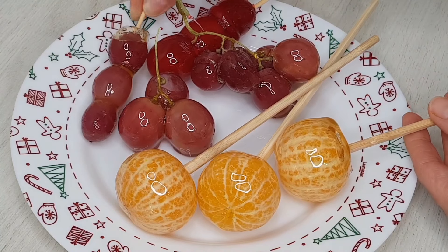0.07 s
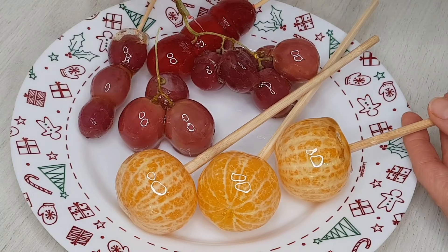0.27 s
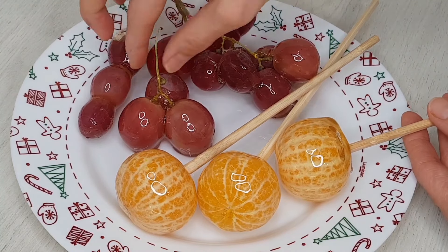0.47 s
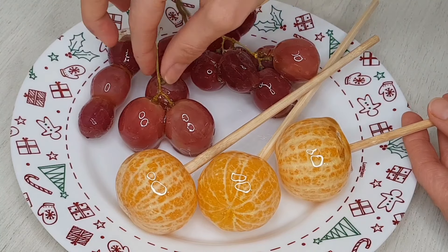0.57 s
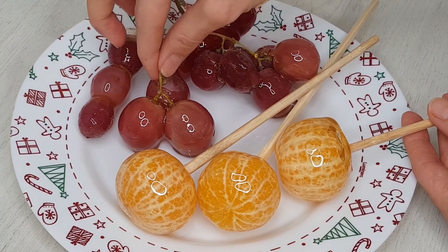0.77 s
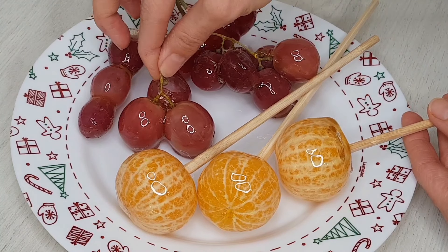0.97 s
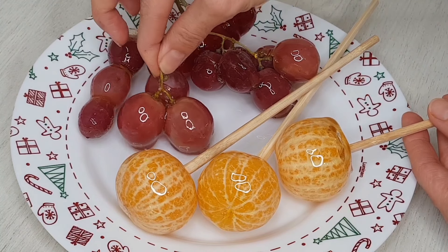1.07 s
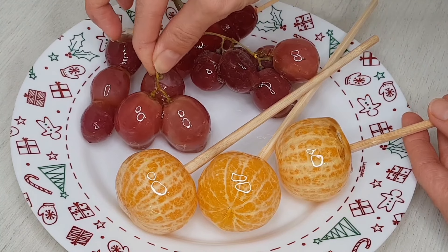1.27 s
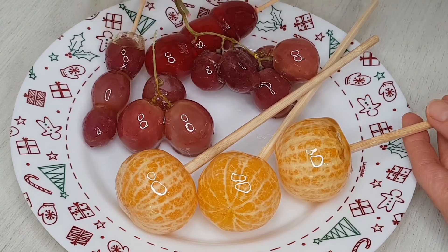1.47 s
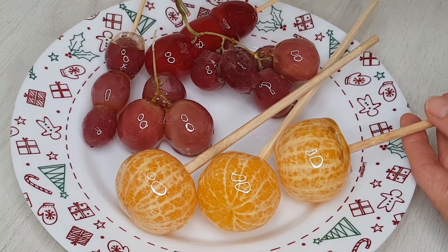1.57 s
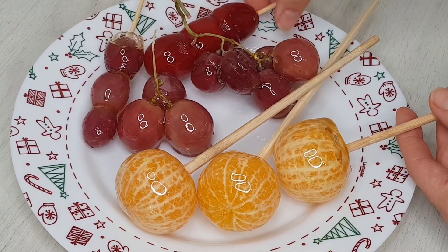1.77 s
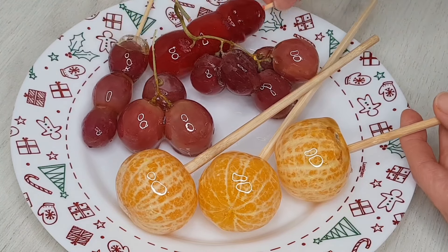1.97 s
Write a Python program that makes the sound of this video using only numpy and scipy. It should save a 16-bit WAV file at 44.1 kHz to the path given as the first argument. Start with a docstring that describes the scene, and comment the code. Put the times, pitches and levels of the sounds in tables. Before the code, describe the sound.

Sugar-coated fruit clinks on a ceramic plate close by, mostly on the right: a soft knock and scrape, sharper knocks, a few faint ticks, then a quick cluster of clacks with light table thumps in a small kitchen.

```python
"""A soft knock and scrape, then sharper knocks: candied grapes on skewers are set down and shifted
on a ceramic plate, close to the microphone and mostly to its right. The hard sugar rings the plate,
glazed fruits clack together, the sugar gives thin, high ticks, and the table thumps underneath.
Farther off, a small kitchen answers over a low rumble and a faint hiss."""
import sys
import numpy as np
from scipy import signal
from scipy.fft import rfft, irfft
from scipy.io import wavfile
from scipy.ndimage import uniform_filter1d

SR = 44100
rng = np.random.default_rng(int(sys.argv[2]) if len(sys.argv) > 2 else 0)


def int16_out(signal):
    """Quantize to a 16-bit WAV file."""
    q = np.round(np.clip(np.atleast_2d(signal).T, -1, 1) * 32767)
    wavfile.write(sys.argv[1], SR, q.astype(np.int16))


N = 88200
BINS = np.fft.rfftfreq(4096, 1 / SR)  # the frequencies [Hz] on which colours are drawn


def knock(level_db, bass_db, treble_db, chatter_s, shell_hz, left_db):
    """A brittle sugar shell lands on the plate and pings briefly at its own pitch."""
    # sugar striking ceramic, heard close: (frequency [Hz], level [dB])
    spectrum = [(40, -21), (100, -9.5), (170, -6.5), (330, -13.5), (520, -5), (800, -6.5), (1250, -1.5),
                (2050, 1.5), (2500, -8.5), (3300, -2.5), (4500, -5.5), (6100, -11), (7000, -15),
                (10500, -19), (13400, -14), (14600, -30)]
    shape = curve(spectrum, BINS) + treble(treble_db) + peak(bass_db, hz=0, width_hz=350.6)
    shell = peak(db=9, hz=shell_hz, width_hz=110)
    hit = contact(strike_s=0.0024, strike_db=-5, chatter_s=chatter_s, chatter_db=-1.91)
    return pan(colour(hit, level_db + shape + shell), left_db)


def clack(level_db, hz, treble_db, hollow_db, left_db):
    """Two glazed fruits meet: a broad resonance and a hollow lower one, damped at once by the flesh."""
    # fruit striking fruit, at a nominal pitch of 2055 Hz: (frequency [Hz], level [dB])
    spectrum = [(60, -24), (180, -15.5), (700, -25.5), (1300, -10.5), (1600, -5), (2000, 8), (2350, -2),
                (3200, -10.5), (4600, -22), (5900, -15.5), (6800, -37.5), (10700, -24.5), (12500, -27),
                (15000, -41)]
    shape = curve(spectrum, BINS * 2055 / hz) + treble(treble_db)
    hollow = peak(hollow_db, hz=1190, width_hz=110)
    hit = contact(strike_s=0.00035, strike_db=-2.1, chatter_s=0.0036, chatter_db=-5.5)
    return pan(colour(hit, level_db + shape + hollow), left_db)


def plate(drive):
    """The ceramic rings; each mode reaches the left of the microphone at its own phase."""
    # modes of the plate: (frequency [Hz], level [dB], t60 [s])
    modes = [(543.4, -9, 0.29), (739, -5.5, 0.23), (1054.3, -11.5, 0.15), (1260, -14.5, 0.17),
             (1490, -18, 0.14), (1694, -20, 0.13), (1924, -12.5, 0.24), (2040, -9.5, .3),
             (2085, -18.5, 0.3), (2645, -16, 0.36), (3202, -9.5, 0.1), (3900, -12.5, 0.15),
             (4450, -10, 0.13), (4890, -14.5, 0.25), (5110, -11, .26), (6172, -3, 0.062),
             (7470, -8.5, 0.069), (8800, -7, 0.12), (10440, -10.5, .09), (12750, -10.5, .1),
             (13400, -10.5, 0.089)]
    t = np.arange(SR // 2) / SR
    ring = np.zeros((2, len(t)))
    for hz, db, t60 in modes:
        phase = [[rng.uniform(-2, 2)], [0]]
        mode = amp(-60 * t / t60) * np.cos(2 * np.pi * hz * t + phase)
        ring += amp(db - 6.5) * mode / np.linalg.norm(mode[0])
    return signal.fftconvolve(drive, ring, axes=1)[:, :N]


def scrape(length_s, level_db, treble_db, left_db, slips_per_s=2800, spread_db=4, size=8192):
    """Sugar drags over the glaze in a run of tiny slips that swells and fades."""
    # sugar sliding on ceramic: (frequency [Hz], level [dB])
    spectrum = [(60, -9), (170, -5.5), (330, -5.5), (500, -5), (750, -6.5), (1400, 1), (2000, -5.5),
                (2600, -3), (4500, -9.5), (7000, -16.5), (10500, -12.5), (15500, -25.5)]
    t = np.arange(size) / SR
    slips = (rng.random(size) < slips_per_s / SR) * amp(spread_db * rng.standard_normal(size))
    slips = slips * pair(rng.choice([-1., 1.], (2, size)), likeness=0.46)
    slips *= np.sin(np.pi * np.minimum(t / length_s, 1))
    slips *= np.sqrt(length_s * SR) / (np.linalg.norm(slips[1]) + 1e-9)
    return pan(colour(slips, level_db + curve(spectrum, BINS) + treble(treble_db)), left_db)


def tick(level_db, crackle_s, crackle_db, left_db):
    """A thin, high tick with a short crackle: a small snap of sugar, or the glassy edge of a hit."""
    # colour of a tick: (frequency [Hz], level [dB])
    spectrum = [(1000, -25.5), (6000, -18.5), (9000, -14.5), (10800, 4.5), (12500, -4), (15500, -9.5)]
    snap = contact(strike_s=0.00025, strike_db=0, chatter_s=crackle_s, chatter_db=crackle_db)
    return pan(colour(snap, level_db + curve(spectrum, BINS)), left_db)


def thump(level_db, hz, rise_s, t60):
    """Weight lands and sets plate and table into a low, dying swing."""
    t = np.arange(SR // 2) / SR
    envelope = amp(level_db - 60 * t / t60) * (1 - np.exp(-t / rise_s))
    return envelope * np.sin(2 * np.pi * hz * t)


def kitchen(sound, walls_s=0.024, early_db=-3):
    """The small room: a dense tail swells when the walls answer; each band dies at its own speed."""
    # decay of the room: (frequency [Hz], t60 [s])
    decay = [(60, 0.46), (130, 0.66), (200, 0.46), (550, 0.35), (1200, 0.39), (2000, 0.41), (4500, 0.48),
             (7000, 0.29), (14000, 0.41)]
    # colour of the room: (frequency [Hz], gain [dB])
    tone = [(60, -1.5), (500, 5), (1900, -2.5), (3000, -7), (4800, -4), (7000, -1), (14000, -4)]
    echoes = burst(fade_s=0.06, likeness=0.71, size=SR)
    echoes /= np.sqrt(abs(uniform_filter1d(echoes ** 2, size=800)) + 1e-18)  # steady level
    hz, frame_s, bands = signal.stft(echoes, SR, nperseg=256)
    bands *= amp(-60 * frame_s / curve(decay, hz)[:, None])
    tail = signal.istft(bands, SR, nperseg=256)[1]
    t = np.arange(tail.shape[1]) / SR
    tail *= amp(early_db * np.exp(-(t / walls_s) ** 4))
    tail = colour(tail / np.linalg.norm(tail[1]), curve(tone, BINS))
    return pan(signal.fftconvolve(sound, tail, axes=1)[:, :N], left_db=1.5)


def hiss(level_db=-65):
    """Room tone: a low rumble, much alike on both sides, and a faint, wide hiss."""
    # steady background: (frequency [Hz], relative density [dB])
    spectrum = [(15, -30), (25, -6.5), (55, 7), (101, -14.5), (119, -5.5), (183, -7), (227, -13.5),
                (631, -18), (945, -22.5), (1140, -19), (1800, -22), (2630, -23), (4500, -25), (4870, -22),
                (7910, -33.5), (11800, -14.5), (15500, -15.5)]
    # its stereo image: (frequency [Hz], left-right likeness [0..1])
    likeness = [(40, 0.94), (200, 0.72), (1000, 0), (12000, 0)]
    hz = np.fft.rfftfreq(N, 1 / SR)
    white = pair(rfft(rng.standard_normal((2, N))), curve(likeness, hz))
    noise = irfft(white * amp(curve(spectrum, hz)), N)
    return pan(amp(level_db) * noise / noise.std(), left_db=-0.5)


def contact(strike_s, strike_db, chatter_s, chatter_db):
    """One sharp strike together with its dying chatter."""
    strike = amp(strike_db) * burst(strike_s, likeness=0.49)
    chatter = amp(chatter_db) * burst(chatter_s, likeness=0.46)
    return strike + chatter


def burst(fade_s, likeness, size=4096):
    """Dying noise with an even spectrum and energy 1 on each side."""
    t = np.arange(size) / SR
    spectrum = rfft(pair(rng.standard_normal((2, size)), likeness) * np.exp(-t / fade_s))
    even = irfft(spectrum / (abs(spectrum) + 1e-12))
    even *= np.exp(-t / fade_s / 10)
    return even / np.linalg.norm(even, axis=1, keepdims=True)


def colour(x, db):
    """Minimum-phase filter with the given gain at each of the BINS."""
    log_gain = np.log(amp(np.concatenate([db, db[-2:0:-1]])))
    taps = np.fft.ifft(np.exp(np.conj(signal.hilbert(log_gain)))).real
    return signal.fftconvolve(x, taps[None, :len(db)], axes=1)


def peak(db, hz, width_hz):
    """A short resonance as a bump in the colour."""
    return db / (1 + ((BINS - hz) / width_hz) ** 2)


def treble(db, corner_hz=3000):
    """A soft treble shelf."""
    return db * BINS ** 2 / (BINS ** 2 + corner_hz ** 2)


def curve(points, hz):
    """A table interpolated on a log-frequency axis."""
    point_hz, value = np.transpose(points)
    return np.interp(np.log(hz + 1), np.log(point_hz + 1), value)


def pair(sides, likeness):
    """Makes two unrelated channels partly alike."""
    left, right = sides
    return np.array([likeness * right + np.sqrt(1 - likeness ** 2) * left, right])


def pan(x, left_db):
    """Raises or lowers the left channel."""
    return x * amp([[left_db], [0]])


def amp(db):
    """Decibels to gain."""
    return 10 ** (np.asarray(db) / 20)


def add(mix, start_s, sound):
    """Adds a sound to a stereo mix."""
    part = mix[:, round(start_s * SR):][:, :sound.shape[-1]]
    part += sound[..., :part.shape[1]]


def scene():
    """The plate close by and to the right of the microphone, the table below, the kitchen around."""
    # sugar hitting the plate: (time [s], level [dB], bass [dB], treble [dB], chatter [s],
    # shell pitch [Hz], left [dB], pitch the struck spot favours [Hz], to plate [dB], to room [dB])
    knocks = [(0.127, -11, 14, -8, 0.0051, 3170, 0.5, 1489, -5, 1.5),
              (0.217, 2.5, 0, 5.5, 0.006, 5260, -0.5, 2095, -4.5, -2),
              (.3703, 11.5, -2.5, 4, 0.0097, 1462, -2.5, 2140, -2.5, -3.5),
              (0.3824, 12, 1, -1.5, 0.0055, 3140, -5, 4440, -2, -1),
              (.3917, 5, 2, -4, 0.0051, 1272, -3, 723.4, -4.5, -2.5),
              (1.23, -5, -14.5, -1.5, 0.0066, 3680, 3.5, 2680, -5.5, -6.5),
              (1.2968, 5.5, 4.5, 4.5, 0.0055, 1710, 0.5, 1700, -8.5, -7),
              (1.444, -3, 3, 2.5, 0.0082, 3400, -0.5, 5980, -10, -25),
              (1.453, 5, -0.5, 1, 0.0021, 4650, -2, 6150, -10, -5),
              (1.4600, -7, 19, 7, 0.0014, 3600, 6.5, 6260, -16.5, -4.5),
              (1.5224, -5.5, 13.5, 2.5, 0.0057, 4940, -2, 537, -4.5, -4)]
    # sugar dragged on the glaze: (time [s], length [s], level [dB], treble [dB], left [dB])
    scrapes = [(0.129, 0.1, -39.5, -7.5, -3), (0.358, 0.027, -25, -7, 0.5), (1.229, 0.094, -44.5, 7.5, 4),
               (1.283, .03, -25.5, 0.5, 0), (1.326, 0.044, -46.5, -6, -2.5), (1.888, 0.09, -77, 24.5, 6)]
    # fruit hitting fruit: (time [s], level [dB], nominal pitch [Hz], treble [dB], hollow [dB],
    # left [dB], to plate [dB], to room [dB])
    clacks = [(0.653, -26, 1950, -4, 6, -3, -7, -5), (1.1147, -16.5, 1810, -5, 2, 1, -12, 3.5),
              (1.2640, 6.5, 2030, 4, 2, -1, -22, -1), (1.2701, -2.5, 2010, 4, 7.5, 4, -23.5, 3),
              (1.3470, 15, 1990, 2, -1, 2.5, -25, -8), (1.3502, 4.5, 2026, 6.5, -3, 3, -18, -5),
              (1.5210, 7, 1980, -10, 6.5, -2, -8.5, -2.5), (1.5250, 8, 1887, -7.5, 12.5, -0.5, -8.5, -0.5),
              (1.5276, 8, 2025, -15, 13, 6, -15.5, -7)]
    # thin, high ticks: small snaps of sugar, and the glassy edge of a knock and a clack:
    # (time [s], level [dB], crackle [s], crackle [dB], left [dB])
    ticks = [(0.8564, -16, 0.0022, -7, -9), (.932, -32, .003, 0.5, -5), (1.113, -35, 0.0082, 10.5, -1),
             (1.2216, -17.5, 0.0044, 9, -1.5), (1.2995, -17.5, 0.00305, 0.5, -3),
             (1.3474, -21.5, .0015, -4.5, -5)]
    # weight landing on the table: (time [s], level [dB], pitch [Hz], rise [s], t60 [s])
    thumps = [(.128, -54, 129.5, 0.016, 0.39), (0.217, -39, 197.6, 0.0017, 0.059),
              (0.238, -51, 126.7, 0.0046, 0.21), (0.372, -42.5, 128.3, 0.0033, 0.3),
              (0.379, -37, 174.5, 0.004, 0.14), (0.376, -48, 58, 0.0054, 0.09),
              (.53, -52.5, 77, 0.0071, 0.18), (0.655, -50, 52.3, 0.0071, 0.22),
              (1.286, -37, 156.7, 0.021, 0.2), (1.337, -48, 61, 0.007, 0.052),
              (1.464, -36.5, 128.4, 0.011, 0.28), (1.523, -40, 203.8, 0.0017, 0.26),
              (1.531, -44.5, 132.5, 0.0061, 0.39)]
    # the left side against the right: (frequency [Hz], gain [dB])
    left_side = [(60, 4), (180, -4.5), (600, -3.5), (1300, -8), (2000, -5.5), (3200, -10.5), (5500, -13.5),
                 (9000, -3.5), (14000, -5)]
    # response of the microphone: (frequency [Hz], gain [dB])
    microphone = [(20, 4.5), (6250, -2), (6650, -6), (7100, -9.5), (7450, -4), (7800, -20), (8150, -23),
                  (8550, -13), (8850, -1.5), (9550, -6.5), (9950, -9), (10400, -1.5), (11000, -6.5),
                  (11600, -4.5), (13400, -8.5), (16000, -6)]

    near, to_plate, to_room = np.zeros((3, 2, N))

    def on_plate(start_s, sound, ring_db, room_db):
        """A contact on the ceramic is heard directly, drives the plate and carries into the room."""
        add(near, start_s, amp(-3) * sound)
        add(to_plate, start_s, colour(sound, ring_db))
        add(to_room, start_s, amp(room_db) * sound)

    for start_s, *settings, spot_hz, ring_db, room_db in knocks:
        spot = peak(db=8, hz=spot_hz, width_hz=150)
        on_plate(start_s, knock(*settings), ring_db + spot, room_db)
    for start_s, *settings in scrapes:
        on_plate(start_s, scrape(*settings), ring_db=np.full_like(BINS, -6), room_db=-4)
    for start_s, *settings, ring_db, room_db in clacks:
        sound = clack(*settings)
        add(near, start_s, sound)
        add(to_plate, start_s, amp(ring_db) * sound[1])
        add(to_room, start_s, amp(room_db) * sound[1])
    for start_s, *settings in ticks:
        add(near, start_s, tick(*settings))
    ring = plate(to_plate)
    mix = near + ring + kitchen(to_room + amp(-8) * ring)
    mix[0] = colour(mix[:1], curve(left_side, BINS))[0, :N]
    for start_s, *settings in thumps:
        add(mix, start_s, thump(*settings))
    return colour(mix, curve(microphone, BINS))[:, :N] + hiss()


def record(dry):
    """The recorder's band limit cuts off the highest treble."""
    low_pass = signal.firwin(511, cutoff=15950, window=("kaiser", 9), fs=SR)
    return signal.oaconvolve(dry, low_pass[None], "same")


dry = scene()
out = record(dry)
int16_out(out)
```